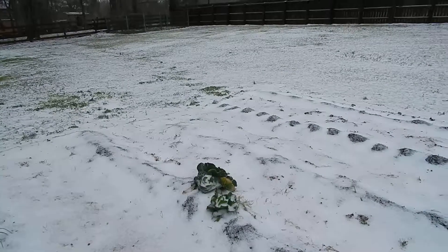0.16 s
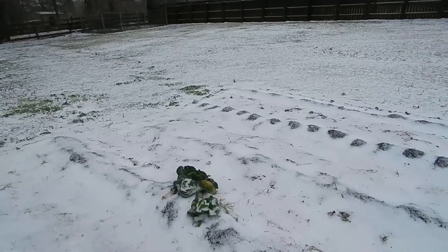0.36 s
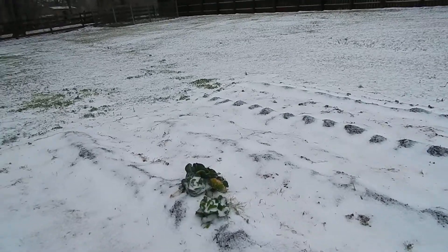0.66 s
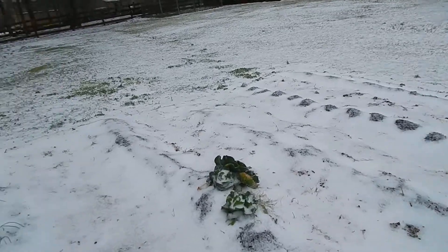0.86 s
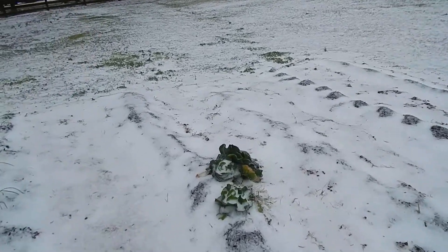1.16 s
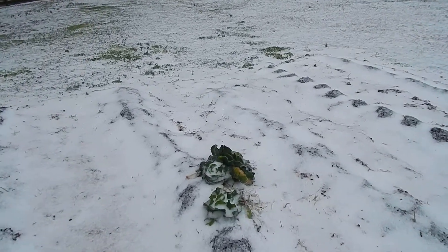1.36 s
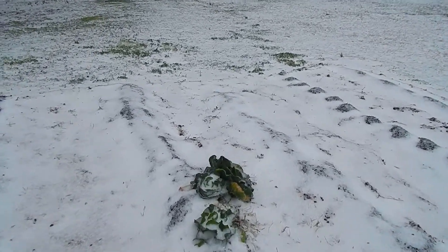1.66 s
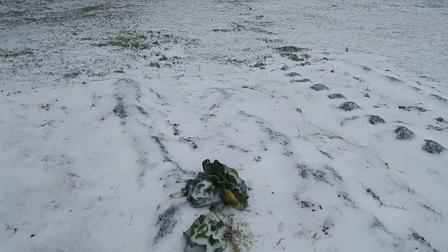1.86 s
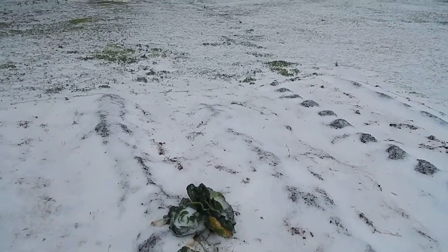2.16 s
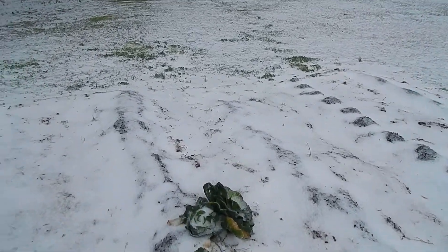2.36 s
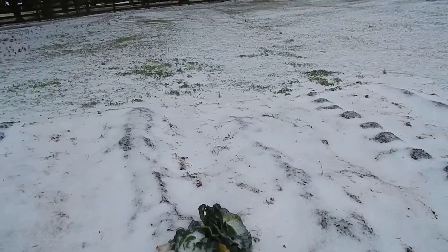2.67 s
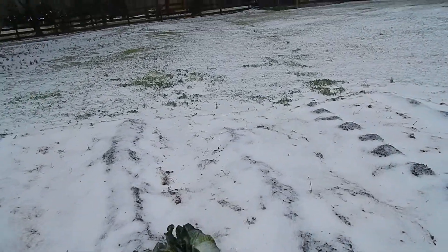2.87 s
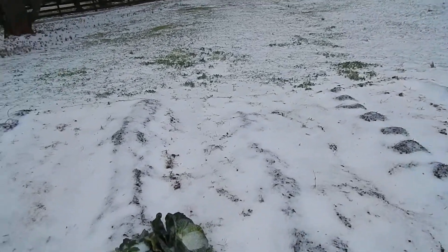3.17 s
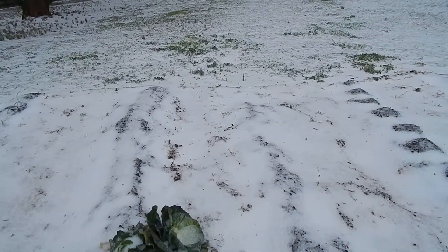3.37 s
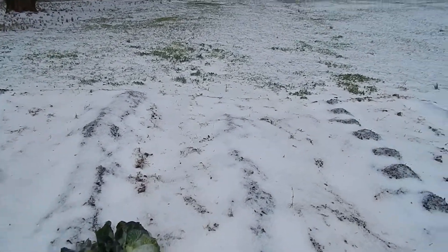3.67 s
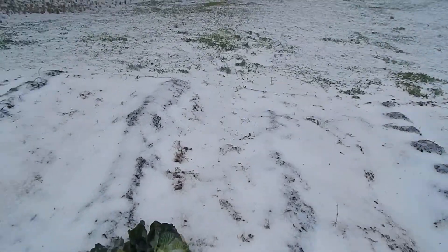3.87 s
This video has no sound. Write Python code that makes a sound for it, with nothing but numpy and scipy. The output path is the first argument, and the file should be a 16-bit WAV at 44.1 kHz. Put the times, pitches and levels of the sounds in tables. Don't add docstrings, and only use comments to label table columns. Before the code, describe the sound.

Boots crunch slowly through crusted snow in a quiet garden, with wind buffeting the microphone.

```python
import sys
import numpy as np
from scipy import signal
from scipy.fft import rfft, irfft
from scipy.io import wavfile
from scipy.ndimage import uniform_filter1d

SR = 44100
rng = np.random.default_rng(int(sys.argv[2]) if len(sys.argv) > 2 else 0)


def dump_mix(stems):
    frames = np.atleast_2d(stems).T
    limited = np.clip(frames, -1, 1)
    pcm = np.round(limited * 32767).astype(np.int16)
    wavfile.write(sys.argv[1], SR, pcm)


def how_loud(loudness_db):
    steps = np.asarray(loudness_db, float) / 20
    return 10 ** steps


N = 176400

# start in seconds, length in seconds, crust level in dB,
# deep crush in dB relative to the crust, fine spray in dB relative to the crust.
PUSHES = [(0.072, 0.051, -33.5, 4.5, -11), (0.125, 0.045, -39.5, -18, -14.5),
          (0.163, 0.07, -34.5, 3.5, -18.5), (0.254, 0.036, -60.5, 10, -3), (0.818, 0.054, -31, -4, -11),
          (0.878, 0.056, -27.5, -4.5, -19.5), (0.928, 0.054, -29, -12, -12.5), (0.983, 0.13, -43, -1.5, -9),
          (1.574, 0.14, -43.5, -3, -8.5), (1.667, 0.067, -34.5, -0.5, -7.5), (1.745, 0.041, -31.5, -5, -10),
          (1.793, 0.14, -38, 0, -7.5), (2.138, 0.41, -51.5, -4.5, -15), (2.748, 0.13, -28, -7.5, -15.5),
          (2.874, 0.11, -33.5, -1.5, -11), (2.982, 0.037, -39.5, -10, -15), (3.021, 0.039, -34.5, 2, -21),
          (3.632, 0.03, -31, -0.5, -6), (3.697, 0.13, -38, -8, -18), (3.823, 0.089, -39, 2, -14.5)]
# start in seconds, length in seconds, level in dB.
SWISHES = [(-.06, 0.18, -42.5), (0.606, 0.25, -55), (1.139, 0.32, -48.5), (2.033, 0.58, -48),
           (3.047, 0.21, -55), (3.537, 0.13, -51.5), (3.688, 0.18, -39.5)]
# frequency in Hz, level in dB.
CRUST = [(150, 1.5), (500, -7.5), (950, 2), (1400, -5), (1800, 2), (3000, -7.5), (6000, -34.5), (9000, -70)]
# frequency in Hz, level in dB.
SPRAY = [(1500, 3), (3500, 2.5), (5500, -3.5), (10500, 1), (13500, -4), (16000, -25)]
# time in seconds, peak in dB, pitch in Hz.
CRACKS = [(0.267, -26, 770), (0.744, -21.5, 1290), (0.992, -13.5, 1080), (1.045, -12, 910),
          (1.086, -11.5, 1220), (1.403, -23.5, 1200), (1.679, -11, 1720), (1.818, -17, 1130),
          (1.917, -20, 1100), (2.171, -23, 1900), (2.271, -17.5, 1760), (2.327, -19.5, 710),
          (2.403, -17.5, 1830), (2.538, -21.5, 2170), (2.616, -23, 1560), (2.989, -17, 1175),
          (3.02, -12.5, 1020), (3.031, -17, 980), (3.34, -32, 1020), (3.519, -22.5, 980),
          (1.197, -21, 464), (1.583, -25, 513)]
# time in seconds, peak in dB, pitch in Hz.
TICKS = [(0.17, -23, 910), (0.197, -13, 821), (0.304, -28, 1110), (0.715, -26, 867), (0.836, -10.5, 970),
         (0.882, -19, 1270), (0.899, -12, 945), (0.91, -5, 920), (0.929, -18, 1010), (0.942, -11, 907),
         (0.955, -10, 960), (1.072, -12.5, 1320), (1.117, -23, 1310), (1.125, -24, 1140),
         (1.185, -25, 1170), (1.223, -28, 950), (1.321, -24, 1220), (1.353, -28.5, 867), (1.436, -33, 961),
         (1.461, -31, 1170), (1.613, -17.5, 930), (1.651, -25, 891), (1.712, -16.5, 953),
         (1.741, -16.5, 1160), (1.771, -18, 1100), (1.78, -8, 1150), (1.798, -19, 1070), (1.858, -15, 904),
         (1.927, -19, 1860), (1.955, -20, 1130), (1.976, -27, 802), (2.055, -24, 1160), (2.074, -26, 1760),
         (2.154, -23.5, 1900), (2.223, -32, 1670), (2.239, -23, 1170), (2.345, -24, 899),
         (2.461, -30, 1600), (2.484, -22, 1140), (2.935, -13.5, 896), (2.974, -11.5, 1020),
         (3.097, -21.5, 1070), (3.125, -35, 960), (3.162, -31, 860), (3.398, -29, 1020), (3.437, -39, 837),
         (3.593, -24, 1070), (3.678, -19, 937), (3.735, -10.5, 980), (3.8, -13, 1750), (3.881, -25, 1010),
         (3.894, -23, 830), (3.962, -34, 921)]
# time in seconds, peak in dB.
SNAPS = [(1.0445, -23.5), (1.0934, -27), (1.1827, -27), (1.6746, -22), (1.8327, -23.5), (2.0722, -26.5),
         (2.8764, -21), (3.0959, -31), (3.5678, -31), (3.5867, -26.5), (3.8726, -27)]
# frequency in Hz, left over right in dB.
LEAN = [(700, .5), (2900, 6), (8000, -3.5)]
# time in seconds, width in seconds, level in dB.
LEFT_GUSTS = [(0.166, 0.044, -31), (0.302, 0.056, -32), (1.07, 0.01, -17.5), (1.202, 0.0063, -28),
              (1.429, 0.022, -16.5), (1.531, 0.066, -30), (1.937, 0.031, -19.5), (2.338, 0.047, -25),
              (2.692, 0.061, -17), (2.955, 0.026, -26), (3.082, 0.023, -11.5), (3.129, 0.07, -19.5),
              (3.213, 0.058, -13.5), (3.265, 0.016, -14), (3.313, 0.0071, -13.5), (3.388, 0.023, -14),
              (3.512, 0.015, -11), (3.594, 0.035, -16.5), (3.707, 0.02, -19), (3.753, 0.021, -11.5),
              (3.866, 0.018, -11), (3.909, 0.022, -6), (3.957, 0.022, -17), (1.02, 0.079, -26.5),
              (2.59, 0.065, -27), (2.78, 0.12, -21), (3.045, 0.013, -13)]
# time in seconds, width in seconds, level in dB.
RIGHT_GUSTS = [(0.174, 0.015, -25), (0.334, 0.035, -31.5), (0.947, 0.042, -32), (1.106, 0.07, -17),
               (1.186, 0.025, -38), (1.377, 0.025, -21), (1.451, 0.055, -25), (1.557, 0.017, -15.5),
               (1.882, 0.034, -30), (2.319, 0.1, -38), (2.439, 0.13, -25.5), (2.763, 0.021, -12),
               (3.111, 0.018, -20), (3.277, 0.018, -8.5), (3.389, 0.083, -27.5), (3.524, 0.0087, -28),
               (3.642, 0.0082, -23), (3.781, 0.14, -20), (3.847, 0.022, -13.5), (3.94, 0.023, -11),
               (1.599, 0.039, -18), (2.699, 0.04, -23), (3.198, 0.038, -23.5), (0.453, 0.029, -32.5)]
# time in seconds, level in dB.
BREEZE = [(0, -38), (.6, -44.5), (1.1, -30), (1.25, -38.5), (1.6, -40), (2.1, -42.5), (3.3, -27.5),
          (4, -28)]
# time in seconds, width in seconds, level in dB, pitch in Hz.
FLAPS = [(3.079, 0.0044, -12.5, 234), (3.221, 0.037, -24, 153), (3.222, 0.019, -23.5, 273),
         (3.268, 0.019, -12.5, 160), (3.386, 0.018, -23.5, 144), (2.761, 0.03, -27, 151),
         (3.914, 0.0042, -10, 257)]
# frequency in Hz, level in dB, 60 dB decay in seconds.
CLICK_MODES = [(3290, -10.5, 0.013), (5190, -14, 0.048), (6450, -20, 0.062), (6440, 5, 0.02),
               (9800, -11, .027), (11480, -3, 0.012)]
# start in seconds, length in seconds, from Hz, to Hz, level in dB.
BIRDS = [
    (.578, .03, 6500, 8200, -58),
    (1.592, .035, 7200, 6500, -53),
    (2.718, .035, 10300, 6500, -54),
]
# frequency in Hz, level in dB.
AIR = [(88, -13.5), (150, -4), (182, -5), (448, -11.5), (566, -14), (2450, -29.5), (11000, -28.5),
       (16000, -34)]

PORT_LAG_S, PORT_SPREAD_S = 0.00013, 0.00009
PORTS_PART_HZ = 1950


def evened(x):
    return x / np.sqrt(np.mean(x ** 2) + 1e-20)


def read(points, hz):
    f, value = np.transpose(points)
    return np.interp(np.log(hz + 1), np.log(f + 1), value)


def add(mix, s, sound):
    at = round(s * SR)
    sound = sound[..., max(-at, 0):]
    part = mix[..., max(at, 0):max(at, 0) + sound.shape[-1]]
    part += sound[..., :part.shape[-1]]


def colour(x, spectrum):
    hz = np.abs(np.fft.fftfreq(4096, 1 / SR))
    log_gain = read(spectrum, hz) * np.log(10) / 20
    taps = np.fft.ifft(np.exp(np.conj(signal.hilbert(log_gain)))).real[:2048]
    return signal.oaconvolve(x, taps[None], axes=1)[:, :x.shape[1]]


def ring(x, hz, width_hz):
    r = np.exp(-np.pi * width_hz / SR)
    return signal.lfilter([1, 0, -1], [1, -2 * r * np.cos(2 * np.pi * hz / SR), r * r], x)


def grains(per_s, spread_db):
    size = how_loud(spread_db * np.minimum(rng.exponential(1, N), 3.8))
    size = size * (rng.random(N) < per_s / SR) * rng.choice([-1, 1], N)
    lag = np.round(SR * (PORT_LAG_S + PORT_SPREAD_S * rng.standard_normal(N))).astype(int)
    arrival = np.clip(np.arange(N) + lag, 0, N - 1)
    return np.array([np.bincount(arrival, size, N), size])


def flicker(seconds, depth_db):
    width = int(seconds * SR)
    swings = uniform_filter1d(uniform_filter1d(rng.standard_normal(N), width), width)
    return how_loud(depth_db * evened(swings))


def both_ports(sound):
    return np.array([np.roll(sound, round(PORT_LAG_S * SR)), sound])


def steps():
    rise_s, sag_db, release_s = 0.006, -2.5, 0.0084
    t = np.arange(N) / SR
    load, deep, spray = np.zeros((3, N))
    for start, length, db, deep_db, spray_db in PUSHES:
        u = t - start
        held = np.clip(u / rise_s, 0, 1) * how_loud(db + sag_db * np.clip(u / length, 0, 1))
        after = np.maximum(u - length, 0)
        shape = held * (how_loud(-20 * after / release_s) + how_loud(-13 - 20 * after / 0.09))
        load += shape
        deep += how_loud(deep_db) * shape
        spray += how_loud(spray_db) * shape
    for start, length, db in SWISHES:
        u = np.clip((t - start) / length, 0, 1)
        spray += how_loud(db) * np.sin(np.pi * u ** 0.64) ** 1.74

    clumps = flicker(0.003, 2.6)
    crust = evened(colour(grains(1500, 1), CRUST))
    for hz in (880, 1050, 1200, 1750):
        plates = ring(ring(grains(170, 3.0), hz, 220), hz, hz)
        crust = crust + how_loud(-5) * evened(plates)
    crush = evened(ring(ring(grains(600, 2.14), 288, 380), 230, 570))
    fine = evened(colour(grains(9000, 0.83), SPRAY))
    out = load * evened(clumps * crust) + deep * evened(clumps * crush)
    return out + how_loud(5.0) * spray * evened(clumps ** 0.62 * fine)


def cracks():
    ring_cycles, tail_db = 5.7, -12.5
    events = CRACKS
    out, t = np.zeros((2, N)), np.arange(900) / SR
    for (s, db, hz), noise in zip(events, rng.standard_normal((len(events), 900))):
        tone = np.sin(2 * np.pi * hz * t) * how_loud(-60 * t * hz / ring_cycles)
        crumble = evened(ring(ring(ring(noise, 1200, 970), 1150, 1800), 2560, 3500))
        tail = how_loud(tail_db) * crumble * how_loud(-60 * t / 0.023)
        add(out, s + 0.0011, both_ports(how_loud(db + 3.5) * (tone + tail)))
    return out


def ticks():
    ring_cycles, tick_db, grit_db = 5.4, -1.5, -9.5
    snap_s, snap_db = 0.004, 0.5
    out, t = np.zeros((2, N)), np.arange(900) / SR
    for (s, db, hz), noise in zip(TICKS, rng.standard_normal((len(TICKS), 900))):
        tone = np.sin(2 * np.pi * hz * t) * how_loud(-60 * t * hz / ring_cycles)
        grit = how_loud(grit_db - 60 * t / 0.013) * evened(ring(ring(noise, 1.47 * hz, 1200), 1200, 2200))
        add(out, s + 0.00109, how_loud(db + tick_db) * both_ports(tone + grit))
    for (s, db), noise in zip(SNAPS, rng.standard_normal((len(SNAPS), 2, 900))):
        burst = evened(colour(noise, SPRAY) + ring(noise, 9800, 5000))
        add(out, s + 0.00051, how_loud(db + snap_db - 60 * t / snap_s) * burst)
    return out


def settling():
    sparse = colour(grains(34, 6.0), CRUST)
    patter = colour(grains(900, 4.0), CRUST)
    return how_loud(-54) * evened(how_loud(-4) * sparse + how_loud(-4) * patter)


def wind():
    s, db = np.transpose(BREEZE)
    band = signal.butter(3, (25, 130), "bandpass", fs=SR, output="sos")
    rumble = signal.sosfilt(band, rng.standard_normal((2, N)))
    lumps = [flicker(0.074, 2.3), flicker(0.039, 7.4)]
    out = how_loud(np.interp(np.arange(N) / SR, s, db)) * evened(rumble * lumps)
    t = np.arange(-6000, 6000) / SR
    for port, gusts in enumerate((LEFT_GUSTS, RIGHT_GUSTS)):
        for (at, width, gust_db), noise in zip(gusts, rng.standard_normal((len(gusts), 12000))):
            shape = np.exp(-(t / (0.62 * width)) ** 2)
            sub, low, top = (evened(ring(ring(ring(noise, hz, hz), hz, hz / 2), hz, hz / 2))
                             for hz in (58, 82, 165))
            puff = shape * (how_loud(0.5) * sub + low + how_loud(-1.0 + 0.52 * gust_db) * top)
            level = np.sqrt(np.sum(shape ** 2) / np.sum(puff ** 2))
            add(out[port], at + t[0], how_loud(gust_db) * puff * level)
    return out


def flaps():
    out, t = np.zeros((2, N)), np.arange(-3000, 3000) / SR
    for at, width, db, hz in FLAPS:
        swing = np.exp(-(t / (0.7 * width)) ** 2) * np.sin(2 * np.pi * hz * t * (1 - 4.9 * t))
        add(out, at + t[0], how_loud([[db + 6.5], [db - 18]]) * swing)
    return out


def click():
    click_s, click_db, push_db = 2.022, -17, -18
    out, t = np.zeros((2, N)), np.arange(3000) / SR
    modes = sum(how_loud(db - 60 * t / t60) * np.sin(2 * np.pi * hz * t) for hz, db, t60 in CLICK_MODES)
    rattle = np.sin(np.pi * np.minimum(t / 0.006, 1) ** 0.7)
    scrape = how_loud(-9.0) * rattle * evened(ring(rng.standard_normal((2, 3000)), 6500, 7200))
    ringing = modes * (rattle + 0.4 * np.minimum(t / 0.0064, 1))
    sound = (ringing + scrape) * how_loud([[click_db - 0.5], [click_db + 0.5]])
    add(out, click_s, sound)
    add(out, click_s - 0.0035, how_loud(-8) * sound)
    onset = np.sin(np.pi * np.minimum(t / 0.00059, 0.5))
    push = how_loud(push_db - 60 * t / 0.02) * onset * -np.cos(2 * np.pi * 300 * t)
    add(out, click_s - 0.0055, push)
    return out


def birds():
    out = np.zeros((2, N))
    for start, length, from_hz, to_hz, db in BIRDS:
        u = np.arange(0, 1, 1 / (length * SR))
        hz = to_hz + (from_hz - to_hz) * (1 - u) ** 1.5
        whistle = np.sin(2 * np.pi * np.cumsum(hz) / SR)
        add(out, start, how_loud(db) * np.sin(np.pi * u) ** 0.5 * whistle)
    return out


def air():
    a, b = rng.standard_normal((2, N))
    apart = signal.sosfilt(signal.butter(1, 1200, "high", fs=SR, output="sos"), a - b)
    wash = evened(colour(np.array([b + apart, b]), AIR))
    dip = 1 - np.exp(-((np.arange(N) / SR - 2.008) / 0.007) ** 2)
    return dip * how_loud(-44.5) * wash * flicker(0.064, 0.97)


def scene():
    left, right = steps() + settling() + cracks() + ticks()
    around = np.tanh(wind() + flaps()) + click() + birds() + air()
    hz = np.fft.rfftfreq(N, 1 / SR)
    left = rfft(right) + rfft(left - right) / (1 + (PORTS_PART_HZ / (hz + 1)) ** 3)
    lean = how_loud(read(LEAN, hz) / 2)
    ground = irfft([left * lean, rfft(right) / lean], N)
    return ground + around


def band_limit(x):
    return signal.sosfilt(signal.butter(12, 15900, fs=SR, output="sos"), x)


def record(dry):
    edge = signal.firwin(1023, 15950, window=("kaiser", 9), fs=SR)[None]
    mix = signal.oaconvolve(dry, edge, "same", axes=1)
    return band_limit(mix)


dry = scene()
out = record(dry)
dump_mix(out)
```